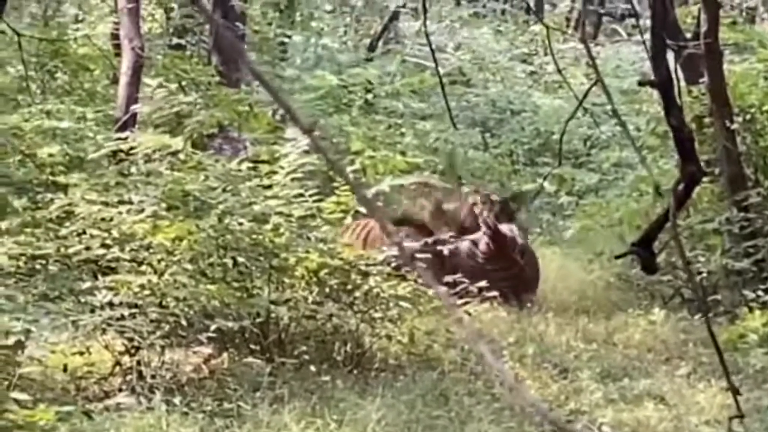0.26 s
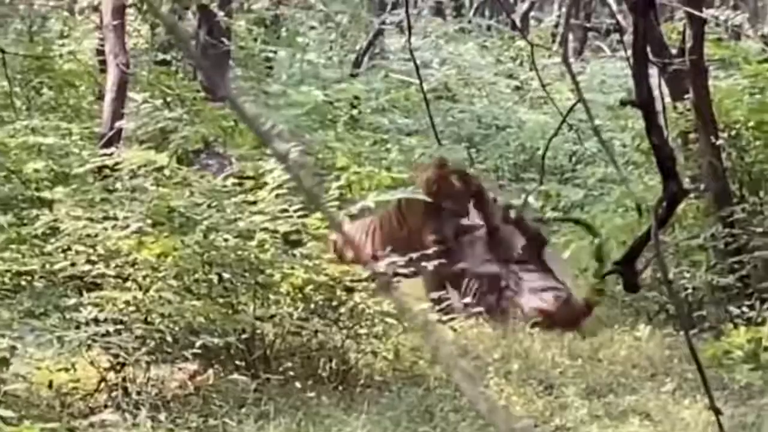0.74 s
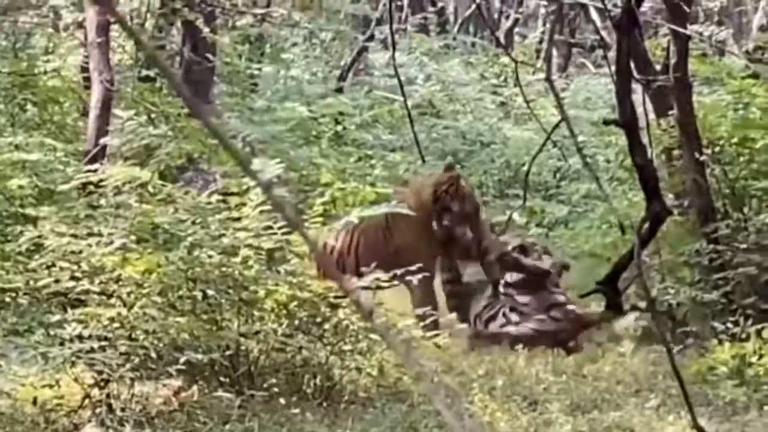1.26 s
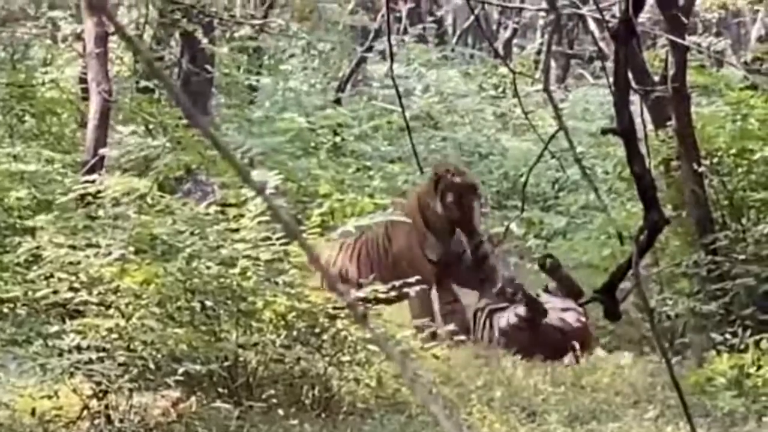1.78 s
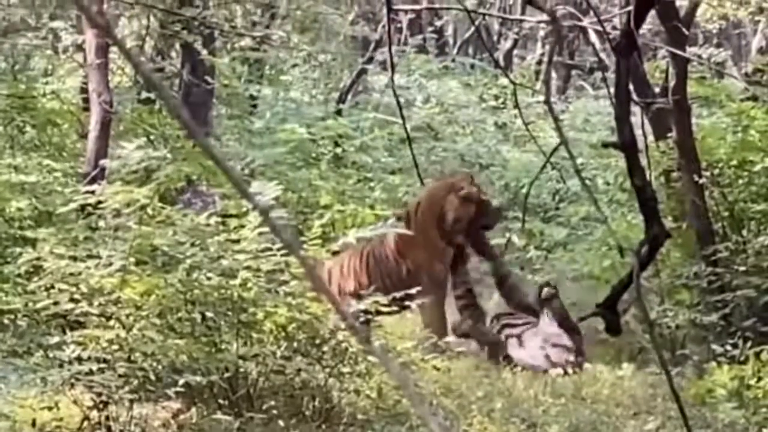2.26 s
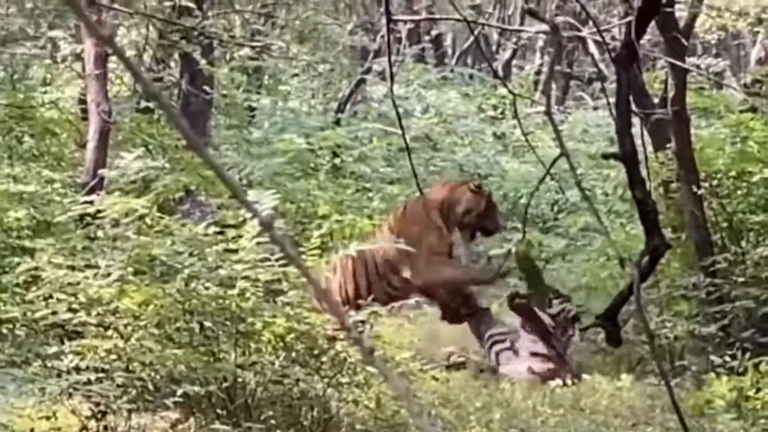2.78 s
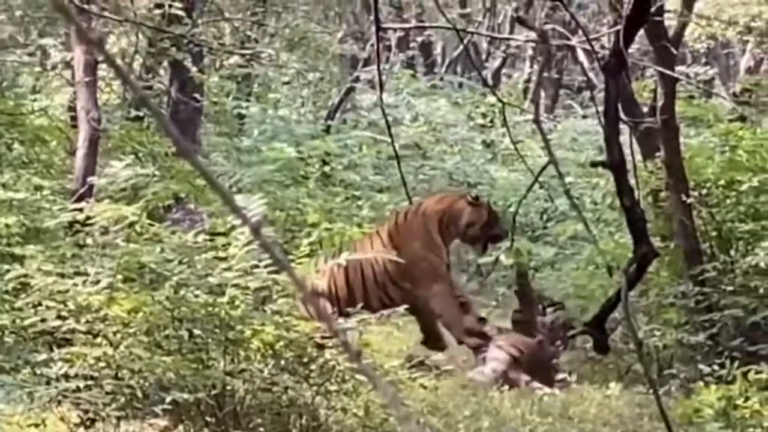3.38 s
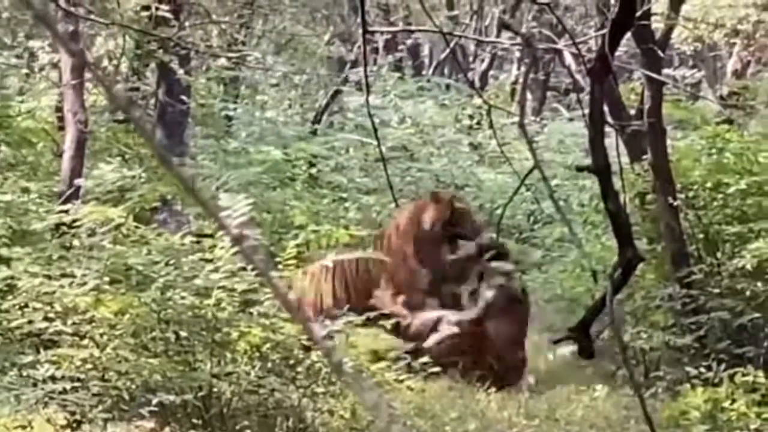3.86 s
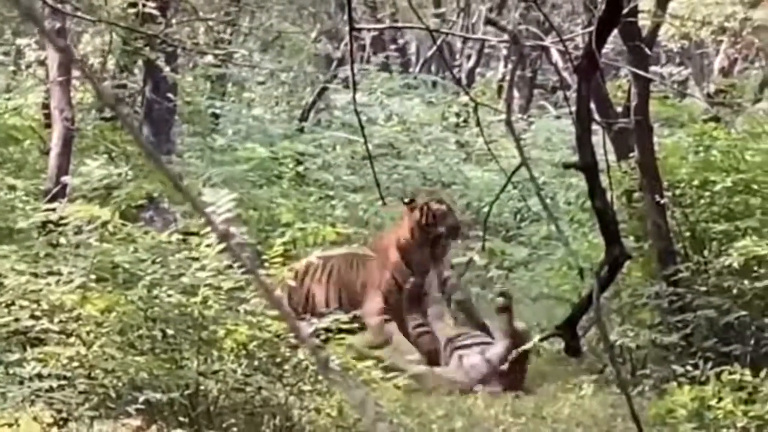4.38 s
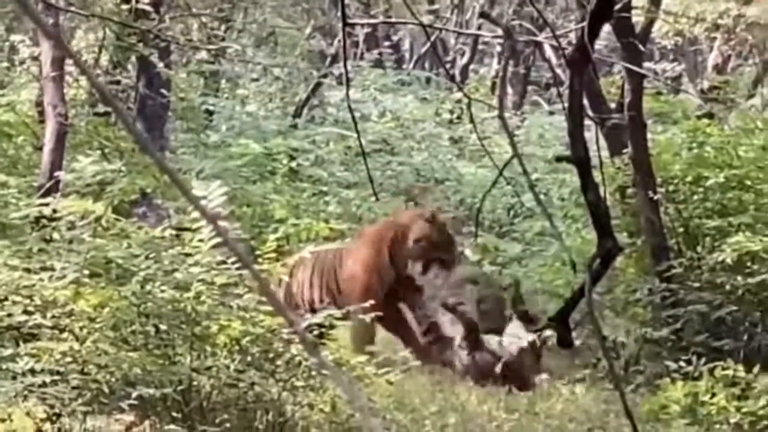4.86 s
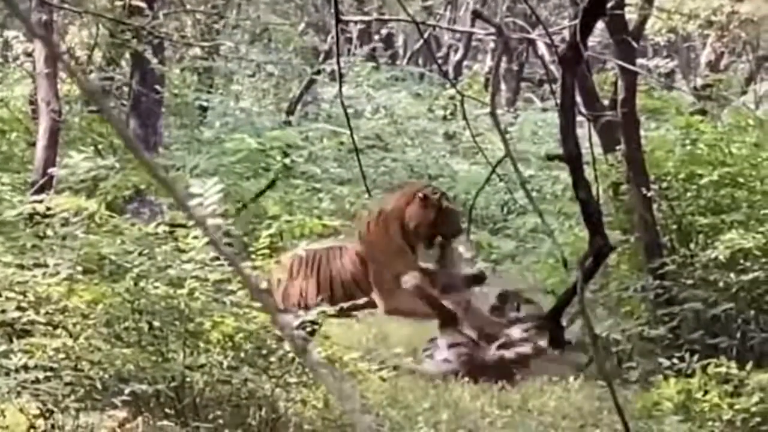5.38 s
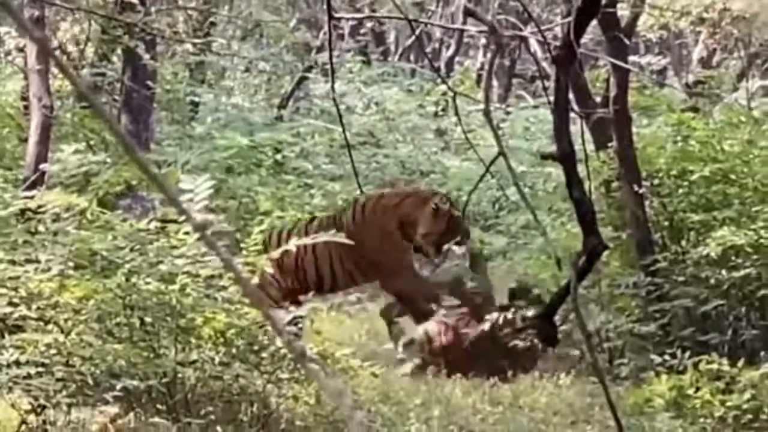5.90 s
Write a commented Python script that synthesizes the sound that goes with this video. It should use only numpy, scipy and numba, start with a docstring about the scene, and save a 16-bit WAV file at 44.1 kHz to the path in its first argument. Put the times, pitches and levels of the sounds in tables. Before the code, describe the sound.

Two tigers wrestle in forest undergrowth, low rattling growls swelling into four harsh, throaty roars, with grass thrashing, twigs snapping and dull body thumps.

```python
"""Two tigers wrestle in forest undergrowth, some way off, trading low growls and louder roars.
Slack vocal folds puff unevenly into the throat, chest and mouth, which ring at gliding pitches.
The mouth adds a snarl and a rasp, and gurgles are single loud flaps of the throat.
Shaped noise makes the thrashed grass, snapping twigs, knocked branches, thumps, shuffling and forest air.
Delayed copies make the echoes from trunks and ground."""
import sys
import numpy as np
from scipy import signal
from scipy.fft import rfft, irfft, next_fast_len
from scipy.io import wavfile
from scipy.ndimage import uniform_filter1d
from numba import njit

SR = 44100
rng = np.random.default_rng(int(sys.argv[2]) if len(sys.argv) > 2 else 0)


def store_wav(level_fs):
    """Save 16-bit WAV to argv[1]."""
    pcm = np.round(np.clip(np.atleast_2d(level_fs), -1, 1) * 32767)
    wavfile.write(sys.argv[1], SR, pcm.T.astype(np.int16))


N = 270377   # length in samples

# forest air, its tone: f/Hz, relative level/dB
FOREST_TONE = [(25, 0.5), (60, 16), (130, 4), (300, -6), (600, -4.5), (950, -14.5), (1400, -7.5),
               (2500, -20), (6000, -31), (12000, -44.5)]
# paws and flanks on the soil, their tone: f/Hz, relative level/dB
SHUFFLE_TONE = [(25, 0), (42, 9), (62, -9), (95, 8), (160, 5), (300, -85), (600, -30)]
# tone of the part that differs between left and right: f/Hz, level/dB
SIDE_TONE = [(30, -6), (80, -94), (280, -16.5), (550, -10), (950, -0.5), (1700, -21.5), (3000, -26.5),
             (6500, -37), (8200, -8), (11000, -17)]
# growls: start t/s, attack t/s, hold t/s, release t/s, level/dB, first throat f/Hz, last throat f/Hz,
# roughness (limited to 0-1), mid-growl snarl f/Hz, mid-growl rasp f/Hz,
# mouth opening as level/dB against the throat, rasp level/dB against the snarl
GROWLS = [(0.041, 0.05, 0.011, 0.052, -38, 115.7, 217.3, 0.58, 514, 1360, -14.5, -16),
          (0.115, 0.044, 0.018, 0.053, -38, 300, 340, 0.9, 550, 1150, -9.5, 2.5),
          (0.156, .13, 0.037, 0.047, -32.5, 337.6, 351.7, 0.71, 507, 1420, -10.5, -7),
          (0.401, 0.048, 0.12, 0.14, -46, 129.6, 121.8, 1.03, 605, 1430, -9.5, -27),
          (1.633, 0.079, 0.028, 0.038, -35, 200.7, 339, 0.55, 660, 1130, -10, -0.5),
          (1.771, 0.022, 0.1, 0.15, -43, 258.5, 150, 0.71, 742, 1128, -3.5, -5),
          (2.879, 0.079, 0.33, 0.069, -37, 152, 137.8, 0.48, 646.7, 1303, -4.5, -8),
          (3.392, 0.087, 0.062, 0.14, -39.5, 135.7, 117.4, 0.58, 609.7, 1490, -6, -2),
          (4.002, 0.14, 0.04, 0.11, -33.5, 179.4, 148, 0.5, 480.2, 1409, -8.5, -2.5),
          (4.249, 0.059, 0.2, 0.09, -45, 144.4, 150.3, 0.76, 539.6, 1330, -5, -14.5),
          (5.39, 0.12, 0.34, 0.067, -39, 180, 145.3, 0.62, 558, 1298, -3, -3.5),
          (5.973, 0.029, 0.028, 0.048, -40, 142.8, 168.3, 0.85, 593.7, 1499, -8, -3),
          (6.046, .075, 0.061, 0.048, -34, 218, 378, 0.89, 514, 1513, -14.5, 1)]
# gurgles: t/s, throat level/dB, mouth level/dB, mouth f/Hz at the start
GURGLES = [(0.105, -46, -52, 800), (0.433, -43, -44.5, 443), (1.665, -39, -41, 718.5),
           (1.737, -33.5, -38, 584), (1.783, -33, -39.5, 1086), (1.825, -37, -38.5, 786),
           (1.873, -43, -43, 794), (1.917, -48.5, -43.5, 793), (2.937, -35, -39.5, 673.7),
           (3.44, -64, -40, 631), (5.527, -34.5, -34.5, 587.5), (5.574, -31, -36.5, 762),
           (5.618, -33.5, -34.5, 571.4), (5.721, -37, -39.5, 576.3), (5.772, -37, -54, 656.5),
           (5.81, -39, -37.5, 740), (5.842, -35, -48, 515)]
# twigs snapping: t/s, level/dB before TWIG_DB
TWIGS = [(0.166, -38.5), (0.217, -38), (0.3103, -33), (0.3512, -33), (0.4136, -37), (0.4554, -32),
         (0.5144, -33.5), (0.5578, -35), (0.6586, -33), (0.9403, -36), (1.7632, -39), (2.139, -36.5),
         (2.1904, -37.5), (2.231, -54), (2.2648, -55), (3.1858, -34), (3.2852, -34), (3.384, -36),
         (3.5786, -37), (3.631, -39.5), (3.647, -35), (3.713, -37.5), (3.732, -38), (3.797, -36),
         (3.838, -37), (3.8609, -36.5), (3.955, -34.5), (4.0195, -35), (4.0593, -32.5), (4.122, -46),
         (4.2233, -32), (4.4158, -36), (4.5799, -33.5), (6.004, -43)]
# bright crack of dry wood, its tone: f/Hz, relative level/dB
CRACK_TONE = [(400, 11), (1200, 2.5), (2500, 6), (4500, 2.5), (7200, 3.5), (9000, -5), (11500, -9)]
# bouts of thrashing in grass and leaves: start t/s, hold t/s, release t/s, level/dB before LEAVES_DB
BOUTS = [(0.19, 0.85, 0.17, -51), (0.936, 0.59, 0.43, -45.5), (2.192, 0.93, 0.2, -48),
         (3.296, 0.19, 0.18, -58.5), (3.505, 0.2, 0.22, -54.5), (3.703, 0.31, 0.19, -52),
         (4.029, 0.8, 0.32, -46), (5.075, 0.18, 0.3065, -46), (5.349, 0.32, 0.24, -50.5),
         (5.612, 0.24, .13, -46.5), (5.97, 0.16, 0.21, -55.5)]
# dry stalks and leaves, their tone: f/Hz, relative level/dB
LEAVES_TONE = [(300, 2.5), (600, 6.5), (1000, 3.5), (2000, 1), (3200, 0), (4800, -2), (7000, -3),
               (9000, -6.5), (11500, -10.5)]
# four roars, one curve each: t/s, effort level/dB, throat f/Hz,
# mouth opening as level/dB against the throat, roughness (limited to 0-1)
ROARS = [
    [(0.68, -56, 152, -20, 0.42), (0.752, -25.5, 190, -19, 0.17), (0.804, -27.5, 209.7, -13.5, 0.39),
     (0.84, -23.5, 251.7, -17, 0.34), (0.884, -28, 255.6, -11, 0.29), (0.915, -23, 283.8, -10, 0.26),
     (0.985, -21.5, 286.7, -15.5, 0.17), (1.13, -31, 251, -3.5, 0.42)],
    [(1.13, -31.5, 289.3, -11, 0.62), (1.204, -18.5, 288, -10, 0.11), (1.228, -20, 293, -14, 0.42),
     (1.275, -17, 313.2, -10.5, 0.3), (1.357, -20.5, 320.8, -7.5, 0.48), (1.364, -14.5, 320.2, -10.5, 0.3),
     (1.44, -25.5, 278.7, -9, 0.58), (1.468, -20.5, 267, -12, 0.32), (1.488, -28.5, 277.4, -9, 0.63),
     (1.552, -26, 257.8, -8.5, 0.48), (1.618, -35, 195.5, -7.5, 0.51), (1.64, -44.5, 181.6, -4, 0.57)],
    [(2.24, -51.5, 325.2, 0, 0.79), (2.258, -35.5, 293.8, -2.5, 0.78), (2.305, -29.5, 304.2, -12, 0.88),
     (2.322, -24, 329.9, -10, 0.54), (2.43, -25, 321.1, -10, 0.61), (2.58, -30.5, 281, -4.5, 0.54),
     (2.615, -27, 298, -6.5, 0.33), (2.736, -30, 280, -7.5, 0.3), (2.828, -45, 196.8, 1, 0.63),
     (2.86, -49, 186.9, -5, 0.7)],
    [(4.63, -52, 201.6, -7, 0.94), (4.704, -37.5, 301.4, -1, 1.03), (4.796, -32, 293.2, -2, 0.92),
     (4.835, -26, 318.3, -2.5, 0.75), (4.95, -26, 296.8, -5, 0.56), (5.045, -26, 266.9, -8.5, 0.49),
     (5.068, -22, 265, -9, 0.31), (5.136, -24, 249.4, -12, 0.48), (5.205, -23.5, 265.6, -13, 0.17),
     (5.26, -32, 238.5, -7, 0.42), (5.38, -50, 223, -12, 0.57)],
]
# voice of each roar: snarl f/Hz and rasp f/Hz (each a glide, evenly spaced from first to last),
# rasp level/dB against the snarl, lip level/dB against the rasp resonance,
# chest level/dB against the throat when the throat is highest, lowest pitch f/Hz
ROAR_VOICES = [((772, 677, 651), (1202, 1188, 1110, 1089, 1020, 898), -0.83, -12.5, -10.5, 90),
               ((696, 631, 547), (1336, 1374, 1250), -6, -6.5, -31, 68), ((590, 587, 560),
               (1160, 1120, 1060), -4, -10.5, -5.5, 68), ((557, 649, 560), (1190, 1147, 1050),
               -3.5, -6, -9, 68)]
# dull thumps of bodies on the ground: start t/s, hold t/s, level/dB
THUMPS = [(1.97, 0.0095, -38), (2.919, 0.042, -43), (3.529, 0.05, -37), (4.042, 0.04, -48),
          (4.658, 0.12, -44), (5.799, 0.043, -43)]
# branches knocked: t/s, level/dB, centre f/Hz
KNOCKS = [(3.952, -40.5, 886), (4.153, -32, 1301)]

TICKS = np.arange(0, N / SR, .002)   # the moments at which gestures are worked out (s)
FOREST_DB, SHUFFLE_DB, LEAVES_DB, TWIG_DB = -49, -52.5, 2.5, -4.5
CUTOFF_HZ = 11600
# a growl has this pitch at this throat resonance; pitch rises as a power of the resonance
GROWL_PITCH_HZ, GROWL_THROAT_HZ, PITCH_FOLLOWS = 71.28, 149.78, .52
GROWL_CHEST_DB, GROWL_LIP_DB = -14.5, -9.5   # chest against throat, lip against rasp resonance
JAW_SAG_OCTAVES_PER_S = 0.25   # the snarl and rasp resonances sink through a growl
ROAR_STOP_DB_PER_S = 400
CHEST_DB_PER_OCTAVE = 8   # in a roar the chest joins in as the throat resonance rises
CHEST_HZ, CHEST_RATIO = 177.5, .67   # the chest resonance stays below this share of the throat's
TONE_SHARE, TONE_WAVER = 0.69, 0.055   # power share of the sung line in the smoothest voice; its waver
OVERTONES_DB = -6.5   # gain of the line's overtones in a taut, smooth voice
CHEEK_HZ, CHEEK_DB = 800, -10.5   # resonance near the snarl, before it follows the throat
MOUTH_FOLLOWS = .12   # how far cheek and lip follow the throat's glide
LIP_HZ, LIP_RISE_HZ = 1284, 210   # broad resonance beside the rasp; its rise at full gape, before following
FLARE_DB, RASP_AIR_DB = -17.5, -13.5   # gain of the harsh top at full gape, and of air past the teeth
RATTLE_PER_S, RATTLE_DB = 28, 12   # a slack throat flaps in slow beats
GURGLE_THROAT_HZ, GURGLE_SAG_OCTAVES_PER_S = 165, 4.4   # start frequency and its fall
GURGLE_ATTACK_S, GURGLE_DECAY_S = 0.0011, 0.029
GROUND_DIP_HZ, GROUND_DIP_Q, GROUND_DIP_DB = 1000, 9, -8
BOUT_ATTACK_S = 0.039
THUMP_HZ, THUMP_ATTACK_S, THUMP_RELEASE_S = 75, 0.015, 0.048
KNOCK_DECAY_S, KNOCK_SPREAD = 0.012, 1.149   # spread: ratio of the band's edge to its centre


def from_db(db):
    """Decibels to gain."""
    return 10 ** (np.asarray(db) / 20)


def rms_one(x):
    """Scale to unit power."""
    return x / np.sqrt(np.mean(x ** 2) + 1e-20)


def noise():
    """Plain hiss, one random number a sample."""
    return rng.standard_normal(N)


def in_time(rows):
    """Each column of a curve at every sample."""
    s, *columns = np.transpose(rows)
    return [np.interp(np.arange(N) / SR, s, column) for column in columns]


def colour(x, points):
    """Filter by a smooth spectrum, in minimum phase so that nothing sounds early."""
    size = next_fast_len(N + SR // 2)
    hz, db = np.transpose(points)
    grid = np.maximum(np.fft.rfftfreq(size, 1 / SR), 1)
    gain = from_db(np.interp(np.log(grid), np.log(hz), db))
    cepstrum = irfft(np.log(gain), size)
    # folding the cepstrum forward gives minimum phase
    cepstrum[1:size // 2] *= 2
    cepstrum[size // 2:] = 0
    return irfft(rfft(x, size) * np.exp(rfft(cepstrum)), size)[..., :N]


def cut(x, hz, kind, order=2):
    """Butterworth low-, high- or band-pass."""
    return signal.sosfilt(signal.butter(order, hz, kind, fs=SR, output="sos"), x)


def drift(rate):
    """Smooth chance of spread 1 that changes about rate times a second."""
    knots = rng.standard_normal(N // 100)
    place = np.arange(N) * rate / SR + rng.random()
    return rms_one(np.interp(place, np.arange(len(knots)), knots))


def steady(x, span_s):
    """Even out the slow level, keeping the flutter within the span."""
    size = int(span_s * SR)
    power = uniform_filter1d(uniform_filter1d(x ** 2, size), size)
    return x / np.sqrt(np.abs(power) + 1e-12)


def scatter(x, first_s, last_s, count):
    """Echoes from trunks and ground that swell and fade as the animals move; same power as the input."""
    out = np.zeros(N)
    for k in range(count):
        lag_s = first_s + (last_s - first_s) * (k + rng.random()) / count
        lag = int(SR * lag_s) + 1
        echo = from_db(-12 * k / count) * drift(9) * x
        out[lag:] += echo[:-lag]
    return rms_one(out) * np.std(x)


@njit
def resonator(x, hz, width, sr):
    """A damped mass on a spring with moving tuning: its band-pass and its high-pass response."""
    out, speed, place = np.zeros((2, len(x))), 0., 0.
    for i in range(len(x)):
        step, damping = 2 * np.pi * hz[i] / sr, width[i] / hz[i]
        place += step * speed
        force = x[i] - place - damping * speed
        speed += step * force
        out[0, i], out[1, i] = damping * speed, force
    return out


def formant(x, hz, q):
    """A moving resonance with steep skirts."""
    for _ in range(2):
        x = resonator(x, hz, hz / q, SR)[0]
    return x


def above(x, hz):
    """A steep moving high-pass."""
    for _ in range(2):
        x = resonator(x, hz, hz, SR)[1]
    return x


def swell(start, attack, hold, release):
    """Attack, hold and release in dB; attack and release each span 20 dB."""
    rising = np.maximum(start + attack - TICKS, 0) / attack
    falling = np.maximum(TICKS - start - attack - hold, 0) / release
    return -20 * np.minimum(rising ** 2 + falling ** 2, 10)


def loudest(gestures):
    """At each moment the gesture with the highest level (its first control) leads; gives every sample."""
    controls = np.array([np.broadcast_arrays(*gesture) for gesture in gestures])
    leading = controls[controls[:, 0].argmax(axis=0), :, np.arange(len(TICKS))]
    return in_time(np.column_stack([TICKS, leading]))


def splinter(energy, decay_s):
    """A snap runs through its fibres in a few milliseconds: onset energies to an amplitude envelope."""
    t = np.arange(SR // 20) / SR
    spread = (1 + t / decay_s) * np.exp(-t / decay_s)
    return np.sqrt(np.abs(signal.fftconvolve(energy, spread)[:N]))


def forest_air():
    """Steady dull noise of the forest: one signal for the middle, one for the sides."""
    hiss = rng.standard_normal((2, N))
    return from_db(FOREST_DB) * rms_one(colour(hiss, FOREST_TONE))


def shuffling():
    """Paws and flanks shuffle unevenly on the soil: deep noise of drifting level."""
    return from_db(SHUFFLE_DB + 3 * drift(14)) * rms_one(colour(noise(), SHUFFLE_TONE))


def jaw(start, end):
    """Factor on the snarl and rasp resonances, which sink as the jaw closes through a growl."""
    return 2 ** (-JAW_SAG_OCTAVES_PER_S * (np.clip(TICKS, start, end) - (start + end) / 2))


def growl(start, attack, hold, release, level_db, first_hz, last_hz, rough,
          snarl_hz, rasp_hz, open_db, rasp_db):
    """Controls of a growl: one swell, in which the throat glides and the pitch follows it."""
    span = start, start + attack + hold + release
    db = level_db + swell(start, attack, hold, release)
    throat_hz = np.interp(TICKS, span, [first_hz, last_hz])
    pitch = GROWL_PITCH_HZ * (throat_hz / GROWL_THROAT_HZ) ** PITCH_FOLLOWS
    snarl_db = db + open_db
    return (db, snarl_db, snarl_db + rasp_db, GROWL_LIP_DB, db + GROWL_CHEST_DB,
            pitch, rough, throat_hz, snarl_hz * jaw(*span), rasp_hz * jaw(*span))


def folds(pitch, rough, wander, jitter, shimmer_db, air):
    """One puff a cycle; roughness unsettles its timing and strength and adds turbulence."""
    wandering = pitch * (1 + wander * rough * drift(40))
    cycles = np.cumsum(wandering) / SR + jitter * rough * drift(130)
    closes = np.diff(np.maximum.accumulate(np.floor(cycles)), prepend=0) > 0
    strength = from_db(shimmer_db * rough * drift(90))
    turbulence = noise() * np.exp(-3 * (cycles % 1))
    return strength * (rms_one(closes * 1.) + air * rough * rms_one(turbulence))


def throat_and_chest(puffs, throat_hz, rough, slack):
    """Puffs ring throat and chest; a smooth voice locks on and sings wavering lines there."""
    width_hz = 45 + 88 * rough   # a rough voice leaks air and damps the throat
    echoed = puffs + 1.01 * scatter(puffs, first_s=0.004185, last_s=.03, count=6)
    throat = above(formant(echoed, throat_hz, q=throat_hz / width_hz), 0.47 * throat_hz)
    chest_hz = np.minimum(CHEST_HZ, CHEST_RATIO * throat_hz)
    chest = formant(puffs, chest_hz, q=2.8)
    waver = 1 + TONE_WAVER * (rough + slack) * drift(45)
    phase, chest_phase = 2 * np.pi * np.cumsum([throat_hz * waver, chest_hz * waver], axis=1) / SR
    clear = np.clip(TONE_SHARE * (1 - rough) ** 2, 0, 1)
    throat = np.sqrt(1 - clear) * steady(throat, span_s=0.034) + np.sqrt(2 * clear) * np.sin(phase)
    chest = np.sqrt(1 - clear) * steady(chest, span_s=0.18) + np.sqrt(2 * clear) * np.sin(chest_phase)
    return throat, chest, phase


def mouth_snarl(source, snarl_hz, opening, quiver, leak):
    """The lower mouth resonance and a weaker cheek resonance ring near it."""
    valleys = from_db(-4) * leak * cut(source, [400, 800], "band")
    snarl = formant(source, snarl_hz * quiver, q=4.6) + valleys
    cheek = formant(source, CHEEK_HZ * opening * quiver, q=10.8)
    snarl = rms_one(snarl) + from_db(CHEEK_DB) * rms_one(cheek)
    return cut(cut(snarl, 342, "high", order=4), 1125, "low", order=6)


def mouth_rasp(source, rasp_hz, lip_db, gape, opening, quiver, leak):
    """Upper mouth and lips ring; the lips draw back at the hardest moments and the voice flares upward."""
    lip_hz = opening * (LIP_HZ + LIP_RISE_HZ * gape)
    rasp = formant(source, rasp_hz * quiver, q=7)
    rasp = rasp + from_db(lip_db) * formant(source, lip_hz * quiver, q=3.2)
    rasp = rasp + from_db(FLARE_DB) * gape * cut(source, [1800, 2600], "band")
    rasp = rasp + from_db(RASP_AIR_DB) * leak * cut(source, [1000, 1900], "band")
    return cut(rasp, 850, "high", order=4)


def rattle(unevenness):
    """Uneven slow beats in dB, each starting sharply and dying away."""
    beats = np.cumsum(RATTLE_PER_S * (1 + unevenness * drift(18))) / SR
    return RATTLE_DB * cut(.5 - beats % 1, 150, "low")


def tigers():
    """Fold pulses ring the chest, the throat and the mouth, whose resonances glide through each call."""
    calls = [roar(curve, voice) for curve, voice in zip(ROARS, ROAR_VOICES)]
    calls += [growl(*row) for row in GROWLS]
    (throat_db, snarl_db, rasp_db, lip_db, chest_db,
     pitch, rough, throat_hz, snarl_hz, rasp_hz) = loudest(calls)
    rough = np.clip(rough, 0, 1)
    slack = np.clip(1 - (throat_hz / throat_hz.max()) ** 2, 0, 1)   # the lower the throat, the looser it is
    puffs = folds(pitch, rough, wander=.07, jitter=.14, shimmer_db=6.5, air=1.0)
    throat, chest, phase = throat_and_chest(puffs, throat_hz, rough, slack)
    # short waves are scattered by the undergrowth, which blurs the pulses
    blurred = puffs + 1.42 * scatter(puffs, first_s=0.001994, last_s=.04, count=22)
    blurred = blurred + 0.4 * rough * noise()
    # a taut throat sends the overtones of its line into the mouth too
    overtones = sum(np.sin(k * phase) for k in range(2, 7))
    blurred = blurred + from_db(OVERTONES_DB) * (1 - slack) * (1 - rough) * overtones
    leak = np.maximum(rough, slack ** 2)   # a rough or slack voice fills the valleys between the resonances
    quiver = 1 + .05 * drift(70)   # of tongue and lips
    opening = 1 + MOUTH_FOLLOWS * (throat_hz / throat_hz.mean() - 1)
    gape = from_db(rasp_db - rasp_db.max())
    snarl = mouth_snarl(blurred, snarl_hz, opening, quiver, leak)
    rasp = mouth_rasp(blurred, rasp_hz, lip_db, gape, opening, quiver, leak)
    rasp_db = rasp_db + 0.11 * (rasp_db - rasp_db.max())   # the rasp fades faster than the voice
    flutter = from_db(slack * rough * rattle(unevenness=0.33))   # low, rough calls flutter unevenly
    body = from_db(throat_db) * steady(throat, span_s=0.021) + from_db(chest_db) * chest
    mouth = from_db(snarl_db) * steady(snarl, span_s=0.025) + from_db(rasp_db) * steady(rasp, span_s=0.042)
    return flutter * (body + mouth)


def gurgles():
    """Single flaps of the slack throat: a low thud and a croak whose pitch sags."""
    t = np.arange(SR // 10) / SR
    envelope = (1 - np.exp(-t / GURGLE_ATTACK_S)) * np.exp(-(t / GURGLE_DECAY_S) ** 2)
    envelope = envelope / envelope.max()
    sag = 2 ** (-GURGLE_SAG_OCTAVES_PER_S * t)
    out = np.zeros(N + SR)
    for s, throat_db, mouth_db, mouth_hz in GURGLES:
        air = rng.standard_normal(len(t))
        thud = steady(formant(air, GURGLE_THROAT_HZ * sag, q=1.5), span_s=0.0067)
        upper = from_db(-20.5) * formant(air, 1.98 * mouth_hz * sag, q=6.2)
        croak = steady(formant(air, mouth_hz * sag, q=4.5) + upper, span_s=0.011)
        start = int(s * SR)
        out[start:start + len(t)] += envelope * (from_db(throat_db) * thud + from_db(mouth_db) * croak)
    return out[:N]


def over_ground(x):
    """The bounce off the ground weakens a narrow band of the voice."""
    band = signal.lfilter(*signal.iirpeak(GROUND_DIP_HZ, GROUND_DIP_Q, fs=SR), x)
    return x - (1 - from_db(GROUND_DIP_DB)) * band


def twigs():
    """Each twig breaks with a short, bright burst of noise."""
    energy = np.zeros(N)
    for s, db in TWIGS:
        energy[int(s * SR)] = from_db(db + TWIG_DB) ** 2
    hiss = cut(noise(), CUTOFF_HZ, "low", order=6)
    return splinter(energy, decay_s=0.0017) * rms_one(colour(hiss, CRACK_TONE))


def grass():
    """Dry stalks snap over a soft swish of leaves; harder thrashing breaks more of them."""
    bouts = [[db + swell(s, BOUT_ATTACK_S, hold, release)] for s, hold, release, db in BOUTS]
    thrash_db, = loudest(bouts)
    effort = np.sqrt(from_db(thrash_db - thrash_db.max()))
    snaps = rng.random(N) < 110 * effort / SR   # 110 snaps a second at full effort
    energy = snaps * from_db(2.2 * np.minimum(rng.exponential(1, N), 3)) ** 2
    swish = 0.95
    envelope = steady(splinter(energy, decay_s=0.0014) + swish, span_s=0.13)
    edges, fibres = np.geomspace(400, CUTOFF_HZ, 13), 0
    for band in zip(edges, edges[1:]):   # the balance of the bands keeps shifting
        fibres = fibres + from_db(1.5 * drift(170)) * cut(noise(), band, "band")
    return envelope * from_db(thrash_db + LEAVES_DB) * rms_one(colour(fibres, LEAVES_TONE))


def roar(curve, voice):
    """Controls of a roar: the throat rings on the third harmonic, unless the pitch is at its lowest."""
    s, *columns = np.transpose(curve)
    db, throat_hz, open_db, rough = [np.interp(TICKS, s, column) for column in columns]
    *glides, rasp_db, lip_db, chest_db, lowest_hz = voice
    span = s[0], s[-1]
    pitch = np.maximum(throat_hz / 3, lowest_hz)
    snarl_hz, rasp_hz = [np.interp(TICKS, np.linspace(*span, len(glide)), glide) for glide in glides]
    chest_db = chest_db + CHEST_DB_PER_OCTAVE * np.log2(throat_hz / throat_hz.max())
    db = db - ROAR_STOP_DB_PER_S * np.abs(TICKS - np.clip(TICKS, *span))   # fades outside its span
    snarl_db = db + open_db
    return (db, snarl_db, snarl_db + rasp_db, lip_db, db + chest_db,
            pitch, rough, throat_hz, snarl_hz, rasp_hz)


def thumps():
    """Heavy bodies land on the soil with a short, deep boom: noise through a low resonance."""
    landings = [[db + swell(s, THUMP_ATTACK_S, hold, THUMP_RELEASE_S)] for s, hold, db in THUMPS]
    db, = loudest(landings)
    boom = formant(noise(), np.full(N, float(THUMP_HZ)), q=1.06)
    return from_db(db) * steady(boom, span_s=0.025)


def knocks():
    """A kicked branch gives a short, hollow knock: a narrow band of noise that dies fast."""
    out, t = np.zeros(N + SR), np.arange(SR // 20) / SR
    for s, db, hz in KNOCKS:
        wood = rms_one(cut(rng.standard_normal(len(t)), [hz / KNOCK_SPREAD, hz * KNOCK_SPREAD], "band"))
        out[int(s * SR):][:len(t)] += from_db(db) * wood * np.exp(-(t / KNOCK_DECAY_S) ** 2)
    return out[:N]


def scene():
    """The wrestling lies nearly straight ahead; the forest sounds from both sides."""
    air, side_air = forest_air()
    voice = over_ground(tigers() + gurgles())
    late_echoes = scatter(voice, first_s=.02, last_s=.16, count=14)
    voice = voice + from_db(-19) * cut(late_echoes, 2000, "low")
    brush = twigs() + grass() + knocks()
    echoes = scatter(from_db(-11.5) * voice + brush, first_s=.003, last_s=.025, count=10)
    side = colour(echoes + from_db(7.5) * side_air, SIDE_TONE)
    middle = brush + shuffling() + thumps() + air
    pan_db = -.5   # the voice is a little louder on the right
    return voice * from_db([[pan_db], [-pan_db]]) + middle + side * [[1], [-1]]


def record(dry):
    """The microphone drops the deepest bass; the top is cut."""
    bass_cut = cut(dry, 79, "high")
    return signal.sosfilt(signal.ellip(10, .2, 80, CUTOFF_HZ, fs=SR, output="sos"), bass_cut)


dry = scene()
out = record(dry)
store_wav(out)
```